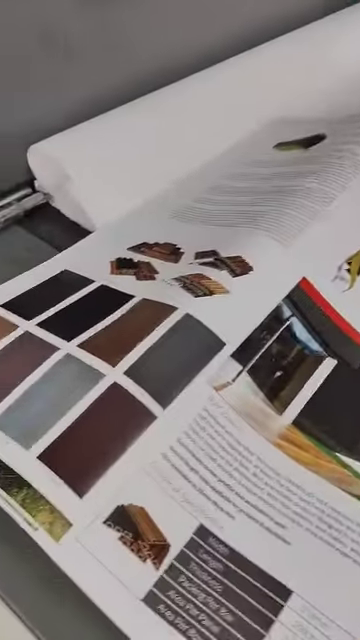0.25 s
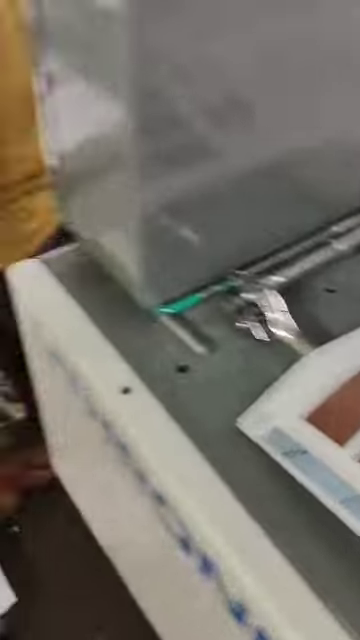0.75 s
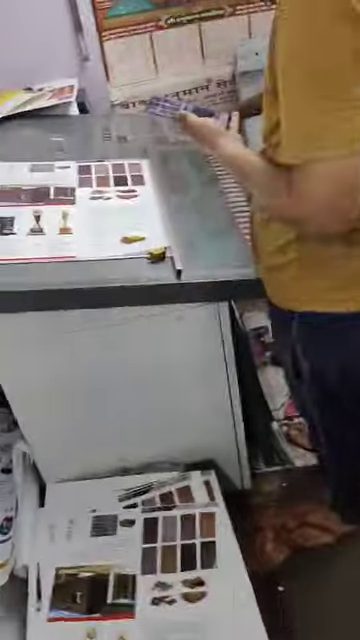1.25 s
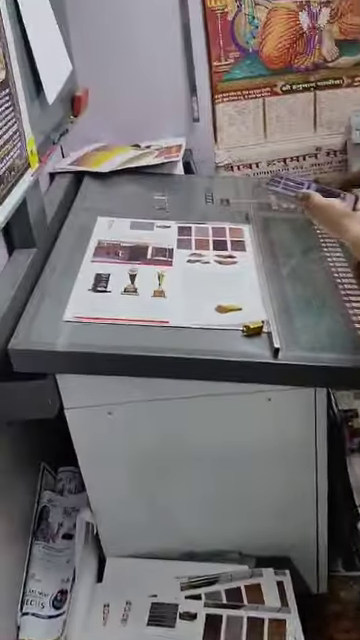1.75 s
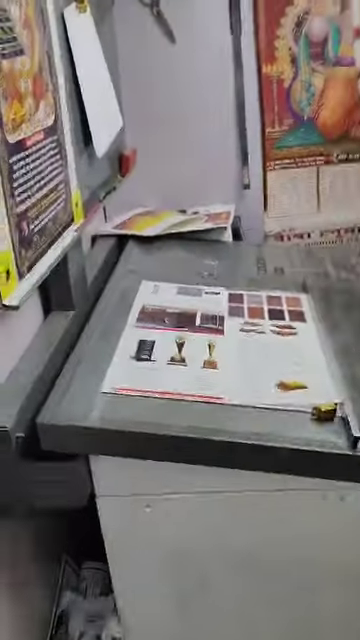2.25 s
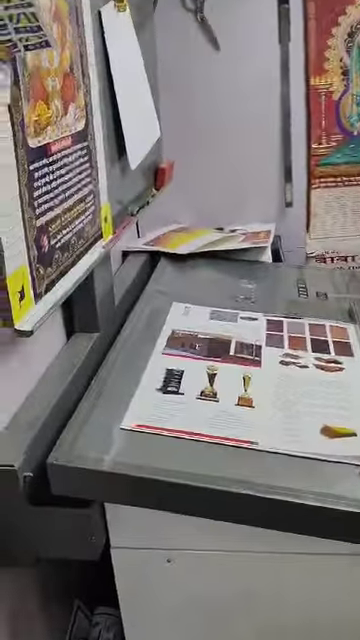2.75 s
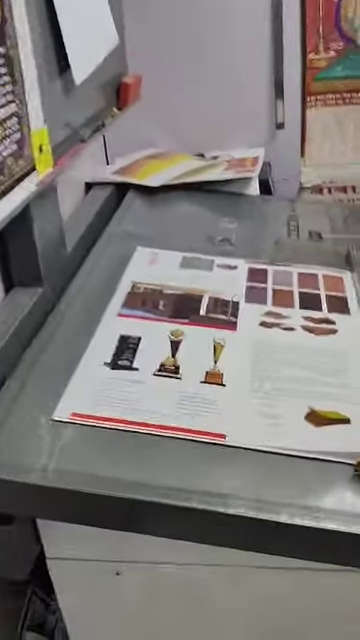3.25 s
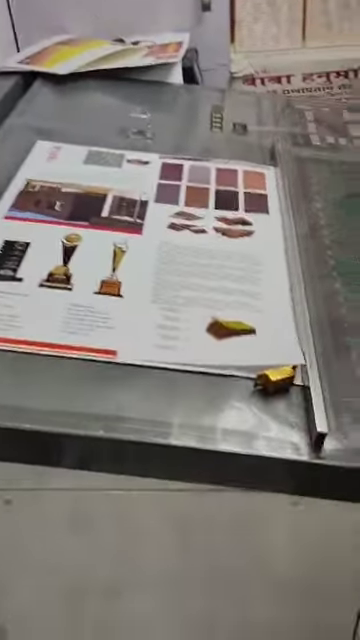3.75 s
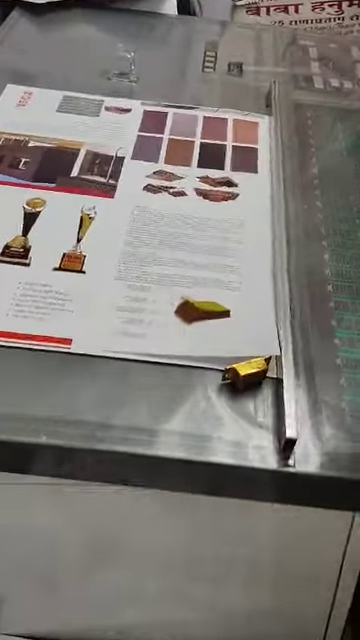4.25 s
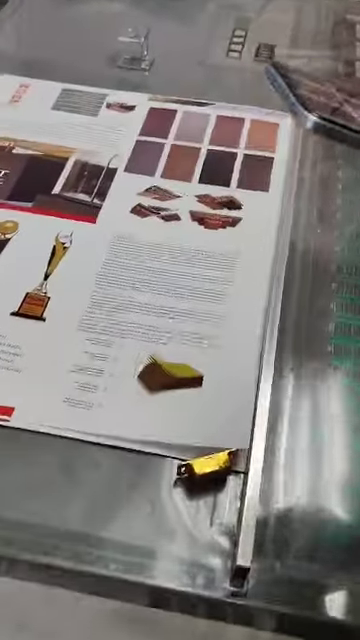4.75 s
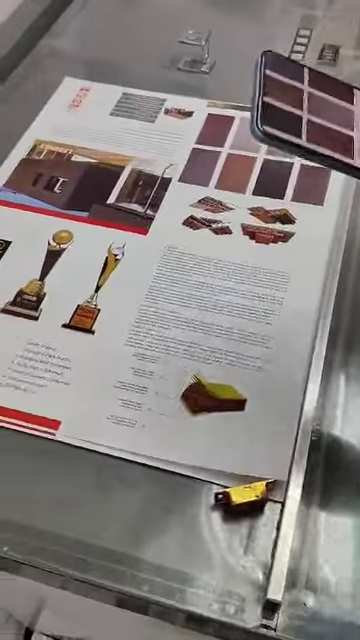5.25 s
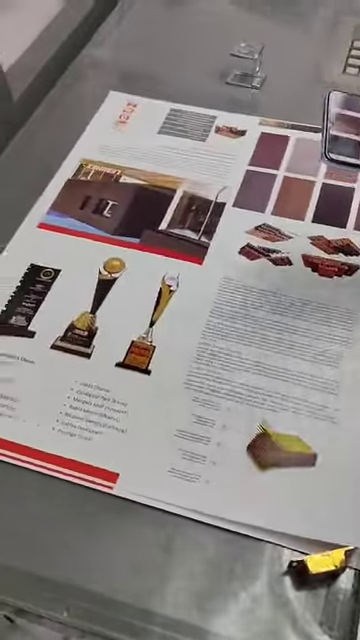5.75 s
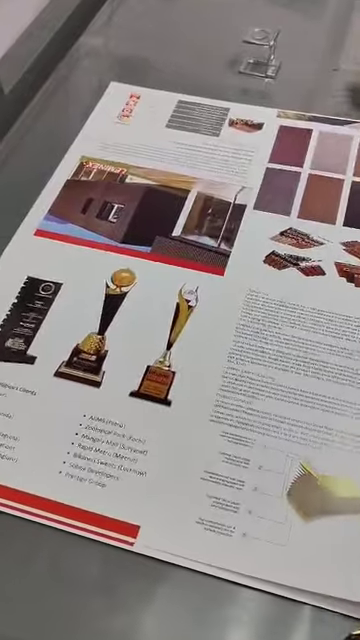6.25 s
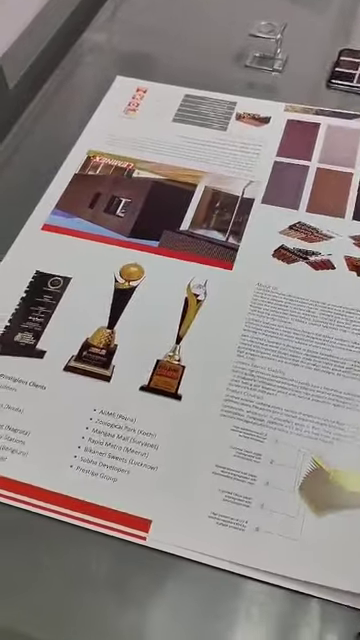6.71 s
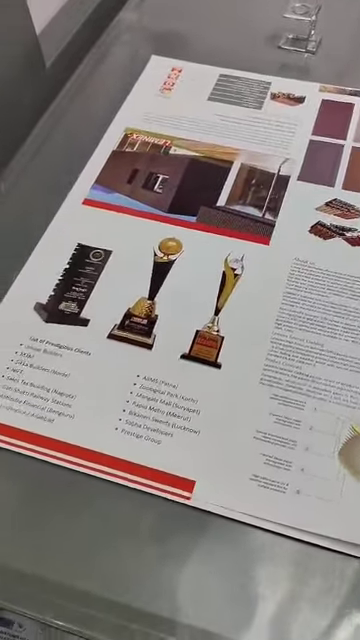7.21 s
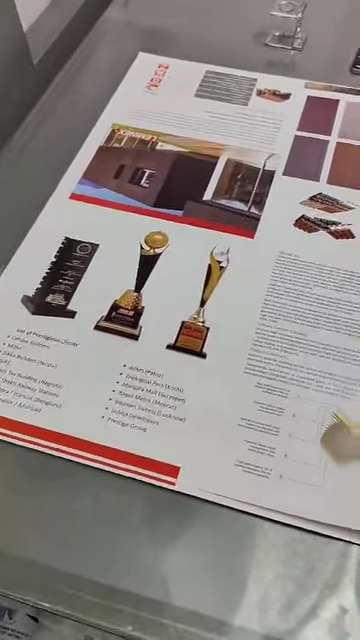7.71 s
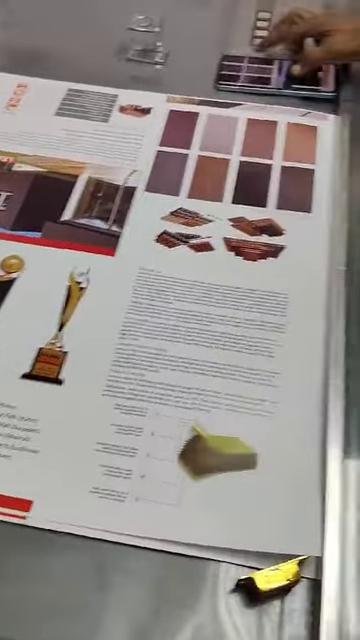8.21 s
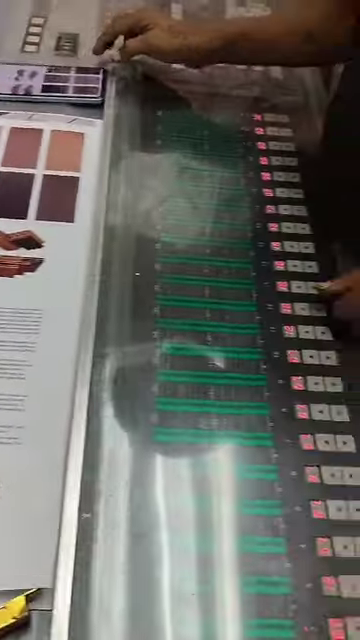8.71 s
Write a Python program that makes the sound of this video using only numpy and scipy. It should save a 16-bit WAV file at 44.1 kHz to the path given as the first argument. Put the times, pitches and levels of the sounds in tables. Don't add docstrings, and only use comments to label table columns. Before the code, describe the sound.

Steady printing machine drone with hissing blowers, gripper clatter, bright pneumatic bursts and dull thuds repeating every half second, heard close by handheld phone.

```python
import sys
import numpy as np
from scipy import signal
from scipy.fft import rfft, irfft, next_fast_len
from scipy.io import wavfile
from scipy.ndimage import uniform_filter1d, map_coordinates

SR = 44100
rng = np.random.default_rng(int(sys.argv[2]) if len(sys.argv) > 2 else 0)


def unload_audio(sound):
    columns = np.transpose(np.atleast_2d(sound))
    steps = np.round(np.clip(columns, -1, 1) * 32767)
    wavfile.write(sys.argv[1], SR, steps.astype(np.int16))


def level_to_linear(level):
    exponent = np.asarray(level, float) / 20
    return 10 ** exponent


N = 395577
TIME = np.arange(N) / SR

# [t/s, peak level/dB, nozzle re peak/dB, open time/s, low jet re peak/dB]
PUFFS = [(0.3765, -13.5, -8, 0.012, -1), (0.895, -12, -13, 0.032, -0.5), (1.403, -13, -8, 0.037, -1),
         (1.9254, -15, -8, 0.05, -1), (2.438, -14, -11, 0.039, 2), (2.9537, -12.5, -8.5, 0.036, -.3),
         (3.4634, -14.5, -12, 0.081, 1), (3.9824, -12.5, -9.5, 0.049, 0.5), (4.4973, -12, -9, 0.015, 1.5),
         (5.0114, -15.5, -7.5, 0.051, 0.5), (5.524, -13.5, -11, 0.022, 1), (6.0445, -13, -8.5, 0.053, 0.5),
         (6.5534, -14, -11.5, 0.079, 1.5), (7.0748, -15.5, -10.5, 0.055, 2.5),
         (7.582, -14.5, -9, 0.063, 2.5), (8.1035, -14, -10.5, 0.052, 2), (8.614, -14, -13, 0.033, 1.5)]
PUFF_TIMES = np.array(PUFFS)[:, 0]
# [t/s, rms level/dB, open time/s]
VENT = (.891, -20, .095)
# [f/Hz, density/dB per Hz]
METAL = [(1500, -6), (2600, -2), (4200, 0), (8000, -3), (11000, -8), (14000, -8)]
# [f/Hz, correlation]
ALIKE = [(30, 0.97), (130, 0.95), (290, 0.8), (630, 0.37), (950, 0.013), (1250, -0.28), (1800, 0.0095),
         (14700, 0)]


def unit(x):
    return x / np.sqrt(np.mean(x ** 2) + 1e-20)


def along(points, hz):
    f, v = np.transpose(points)
    return np.interp(np.log(hz + 1), np.log(f + 1), v)


def curves(rows):
    s, *columns = np.transpose(rows)
    return [np.interp(TIME, s, column) for column in columns]


def wobble(rate, channels=1):
    knots = rng.standard_normal((channels, int(N * 40 / SR) + 4))
    coarse = [map_coordinates(k, [TIME[::64] * rate]) for k in knots]
    return np.array([curve.repeat(64)[:N] for curve in coarse])


def filtered(x, response):
    m = next_fast_len(N + 8192)
    return irfft(rfft(x, m) * response(np.fft.rfftfreq(m, 1 / SR)), m)[..., :N]


def rush(spectrum, patchy_db):
    z = signal.stft(rng.standard_normal((2, N)), nperseg=512)[2]
    patches = uniform_filter1d(rng.standard_normal(z.shape[1:]), size=6, axis=0)
    patches = uniform_filter1d(patches, size=10, axis=1)
    pair = signal.istft(z * level_to_linear(patchy_db * unit(patches)), nperseg=512)[1][:, :N]

    def mid_side_response(hz):
        spread = np.arccos(np.clip(along(ALIKE, hz), -1, 1)) / 2
        return level_to_linear(along(spectrum, hz)) * [np.cos(spread), np.sin(spread)]

    mid, side = filtered(pair, mid_side_response)
    return unit(np.array([mid + side, mid - side]))


def tone(hz, drift, fade_db, rate):
    apart = 1 - np.clip(along(ALIKE, hz), 0, 1)
    lag = apart * (np.pi / 4 * np.array([[1], [-1]]) + 0.14 * wobble(rate, channels=2))
    phase = drift * wobble(rate) + lag + rng.uniform(0, 2 * np.pi)
    fade = level_to_linear(fade_db * (wobble(rate) + apart * wobble(rate, channels=2)))
    return np.sqrt(2) * fade * np.sin(2 * np.pi * hz * TIME + phase)


def burst(s, rise, hold, t60):
    out = np.zeros(N)
    start = max(int(s * SR), 0)
    length = int((abs(hold) + 2 * abs(t60)) * SR) + 64
    t = np.maximum(TIME[start:start + length] - s, 0)
    decay = level_to_linear(-60 * np.maximum(t - hold, 0) / max(t60, 1e-3))
    out[start:start + len(t)] = (1 - np.exp(-t / max(rise, 1e-4))) * decay
    return out


def spotted_level(wave):
    mean_db, spots = wave
    return mean_db + sum(lift_db * np.exp(-(2 * (TIME - s) / width) ** 2) for s, width, lift_db in spots)


def machine():
    frame = -19, [(.8, 0.27, 0.5), (1.5, 0.2, -2.5), (2.25, 0.29, -1), (2.55, .2, 0.5), (3.15, 0.71, 2.5),
             (3.66, 0.1, -1), (5.06, .08, -8), (5.95, 0.69, 3), (7.62, 0.083, -4), (7.8, 0.36, -2),
             (8.45, 0.069, 0)]
    # [t/s, level/dB]
    near = [(0, 0.5), (.9, 0.6), (1.7, -0.5), (3.5, -0.5), (5.5, 0), (8.97, -0.1)]
    # [f/Hz, density/dB per Hz]
    rumble_colour = [(18, -60), (32, -22), (65, -1.5), (85, -4.5), (100, 3.5), (135, -0.5), (175, 1.5),
                     (260, -9), (400, -29.5)]
    roar_colour = [(120, -23), (200, -3), (295, -4), (370, -1.5), (420, -3), (460, -2.5), (540, -5.5),
                   (685, -6), (720, -8), (1000, -11), (1160, -8), (1300, -14.5), (1700, -25.5), (2500, -34)]
    hiss_colour = [(600, -13), (1300, -2), (1700, -3), (14500, 2)]
    roar_db, hiss_db = -15, -21.5
    null_hz, null_width_hz, null_db = 187, 16, -5
    near_db, = curves(near)
    rumble = level_to_linear(spotted_level(frame) + 1.1 * wobble(3.1)) * rush(rumble_colour, patchy_db=-0.5)
    roar = level_to_linear(roar_db + near_db + 0.077 * wobble(10.0)) * rush(roar_colour, patchy_db=0.18)
    body = filtered(rumble + roar, lambda hz: level_to_linear(null_db * np.exp(-((hz - null_hz) / null_width_hz) ** 2)))
    heave = level_to_linear(hiss_db + 6 + 0.69 * wobble(13) + 0.59 * wobble(36))
    return body + heave * suction() * rush(hiss_colour, patchy_db=1.5)


def suction():
    return level_to_linear(-1.1 * sum(burst(s - .075, 0.011, 0.061, 0.055) for s in PUFF_TIMES))


def tones():
    pump_hz = [28.2, 48.4, 96.9, 193.8]
    pump_wander = [.12, .3, 1.3, .1]
    gear_hz = [1164.1, 2217, 4434.5]
    # [f/Hz, rms level/dB]
    wheels = [(55.2, -40), (131.9, -35), (454.9, -37), (986.5, -41), (1144, -37.5), (1983.7, -52),
              (2138.5, -54), (3493.8, -64)]
    # [t/s, level/dB]
    load = [(0, -20), (.25, -24), (.85, -21.5), (1.05, -21.5), (1.3, -28), (1.75, -22), (2, -46),
            (2.4, -38), (2.7, -23), (3.3, -27), (3.5, -38), (3.7, -23.5), (4.1, -27.5), (4.4, -20.5),
            (4.7, -18.5), (8.0, -17.5), (8.4, -16), (8.55, -38)]
    fan_wave = -30.5, [(.5, 1.4, -3), (3.7, .2, 9), (4.9, .3, 9), (5.6, .5, 5.5), (6.7, .3, -3),
                (7.8, .4, 5)]
    motor_wave = -31, [(2.75, 0.28, -12), (3.35, .3, -2), (4, .3, -9), (8, .4, 9), (8.9, .5, -16)]
    vane_wave = -28.5, [(.5, 0.25, 13), (1.5, 2.4, -7), (3.6, .2, -1), (5.3, 0.23, 5), (6.9, 0.22, 5),
                 (7.65, 0.18, -18), (7.95, 0.31, 6), (8.64, 0.22, 7)]
    mesh_wave = -27.5, [(0, 1, -16), (.7, .12, 8), (1.05, 0.41, -4), (1.85, 0.12, -16), (2.2, 0.28, -2),
                 (2.45, 0.19, -1), (2.82, 0.38, 8.5), (3.2, 0.14, -9), (3.95, 0.17, -10), (4.3, 0.26, 1),
                 (4.65, 0.14, 2), (5.2, 0.49, -9), (5.75, .15, -4), (6.47, 0.13, -11), (6.6, .12, 2),
                 (7.35, 0.67, 3.5), (7.68, 0.08, -4), (7.9, .3, 0.5), (8.16, 0.15, 0), (8.6, 0.28, -7),
                 (8.8, .2, 3)]
    bearing_wave = -39.5, [(.95, .12, 8), (4.55, .12, 5.4), (6.57, 0.11, 7.2), (7.62, 0.14, 8.8)]
    twice_wave = -37, [(.55, .15, 9.3), (.95, 0.13, 8), (1.45, 0.12, 5.4), (3.33, 0.22, 9.8), (4.1, .2, 4),
                  (6.35, 0.35, 11), (7.62, .2, 5), (8.75, .2, 4)]
    pump_db = spotted_level(fan_wave), spotted_level(motor_wave), spotted_level(vane_wave), *curves(load)
    hum = sum(level_to_linear(db - 1.0) * tone(hz, drift, 0.93, 3 + 6 * drift)
              for hz, db, drift in zip(pump_hz, pump_db, pump_wander))
    lean_db = -4 + 7.5 * wobble(1.99)[0]
    mesh_db = spotted_level(mesh_wave) - .5 + np.outer([.5, -.5], lean_db)
    mesh = level_to_linear(mesh_db) * tone(gear_hz[0], .6, 1.1, 15)
    bearing = level_to_linear(spotted_level(bearing_wave) - 6) * tone(gear_hz[1], 1.3, 2.5, 7)
    twice = level_to_linear(spotted_level(twice_wave) + np.array([[-8.5], [-3.5]])) * tone(gear_hz[2], .8, 2.1, 5.9)
    faint = sum(level_to_linear(db) * tone(hz, 2.3, 2.7, 3) for hz, db in wheels)
    return hum + mesh + bearing + twice + faint


def swells():
    # [f/Hz, density/dB per Hz]
    casing_colour = [(320, -56), (365, 28), (392, -25), (415, 13.5), (470, -36)]
    boom_wave = -28, [(.25, 0.76, 10), (1.85, .15, 9), (2.1, 0.16, 0), (3.55, 1, 2), (4.3, 0.83, -3),
                 (6.2, 0.8, -12), (7.7, 0.85, 6), (8.6, .2, 10)]
    ring_pulses = -7, [(3.1, 0.41, 7), (4.25, 0.26, 9), (3.32, 0.11, 10.5), (3.48, .11, 17),
                   (3.63, 0.061, 14.5), (3.81, 0.12, 15), (3.97, 0.14, -6), (4.12, 0.22, 10), (4.35, .3, 1)]
    idler_wave = -33, [(.2, 1, 6.5), (1.6, 0.62, 6.3), (2.7, 0.13, 9.8), (3.8, .25, 8.1), (4.35, 0.4, 7.8),
                  (4.75, 0.13, 9.2), (5.75, 0.33, 11.4), (8.3, 0.23, 6)]
    pair_wave = -36.5, [(.62, 0.18, 7.2), (1.8, 0.31, 6), (2.2, 0.22, 7), (3, 0.93, 5.3), (3.97, 0.18, 7.7),
                 (4.97, 0.17, 11), (4.45, .2, 6), (5.65, .2, 6), (6.15, 0.17, 5), (7.6, .5, 5.4)]
    sideband_wave = -30.5, [(1.4, .4, 3.4), (2.12, 0.22, 7.7), (2.8, .25, 4.5), (4.4, 0.13, 14.5),
                     (6.3, 0.61, 10.7), (7.3, .4, 4.8), (8.4, .3, 6.7), (8.85, 0.22, 11)]
    # [f/Hz, level/dB]
    boom_notes = ((394, 0), (388, -13))
    pair_hz = (947.5, 954.2)
    sideband_hz = (1121.1, 1126.5)
    idler_hz = 681
    ring = level_to_linear(spotted_level(ring_pulses)) * sum(level_to_linear(db) * tone(hz, .6, .8, 5) for hz, db in boom_notes)
    boom = level_to_linear(spotted_level(boom_wave)) * (level_to_linear(-5) * rush(casing_colour, patchy_db=0.0) + ring)
    idler = level_to_linear(spotted_level(idler_wave) - 3.5) * tone(idler_hz, 1.1, 2.6, 14)
    pair_amp = level_to_linear(spotted_level(pair_wave) - 2.2)
    pair = sum(pair_amp * tone(hz, .5, 1.2, 4) for hz in pair_hz)
    sideband_amp = level_to_linear(spotted_level(sideband_wave) - 8)
    return boom + idler + pair + sum(sideband_amp * tone(hz, 1.3, 1.5, 5) for hz in sideband_hz)


def feeder():
    # [f/Hz, density/dB per Hz]
    leak_colour = [(6000, -23), (7500, 8), (8500, -1.5), (10000, 7), (11800, -6), (13500, -6), (14500, -30)]
    jet_colour = [(900, -3), (1250, 16.5), (1500, 8), (1800, 3.5), (2400, 3.5), (3000, 5), (3600, -1),
                  (4700, -13)]
    nozzle_colour = [(2200, -28), (3000, -13), (3900, 5.5), (4700, -7), (5500, -23), (6500, -33)]
    blast_colour = [(3500, -22), (5000, -8), (8200, 0), (11000, -1.5), (12500, 1), (14500, -7.5)]
    whistle_colour = [(11500, -26), (12500, -8), (13000, -1), (13650, 2), (14200, -9), (14600, -9)]
    # [delay t/s, size]
    latch_clicks = [(.085, .3), (.14, .4), (.26, .25)]
    # [t/s, rms level/dB, open time/s]
    dribble = (1.03, -20, 0.079)
    jet_re_puff_db, jet_db_per_s = -6.5, -0.08
    whistle_db, whistle_db_per_s = -11.3, .35
    sputter_db = 1.6
    leak, jet, nozzle, blast, whistle = np.zeros((5, N))
    for s, db, nozzle_db, hold, jet_db in PUFFS:
        s = s - .003
        tail = level_to_linear(-8.5) * burst(s, 0.037, hold, 2.5)
        latches = sum(size * burst(s + after, .001, .004, .07) for after, size in latch_clicks)
        seep = burst(s - .028, 0.003, 0.016, 0.063) + 0.62 * burst(s + 0.092, 0.014, .03, .3)
        leak += level_to_linear(db - 7.5) * seep
        jet_amp = level_to_linear(db + jet_db + jet_re_puff_db + jet_db_per_s * s)
        jet += jet_amp * (burst(s, 0.0015, hold, 0.24) + 0.7 * tail)
        nozzle += level_to_linear(db + nozzle_db) * (burst(s, 0.0075, hold, 0.2) + 0.52 * tail)
        blast += level_to_linear(db - 0.5) * (burst(s, 0.0024, hold, 0.21) + tail + latches)
        whistle += level_to_linear(whistle_db + whistle_db_per_s * s) * burst(s - .002, .004, .022, .3)
    blast += level_to_linear(-16.5) * burst(-0.16, .01, .05, 2.7)
    dribble_s, dribble_db, dribble_hold = dribble
    blast += level_to_linear(dribble_db) * burst(dribble_s, .02, dribble_hold, .3)
    low = jet * rush(jet_colour, patchy_db=.6) + nozzle * rush(nozzle_colour, patchy_db=.6)
    high = blast * rush(blast_colour, patchy_db=1.5) + whistle * rush(whistle_colour, patchy_db=1.2)
    flapping = unit(uniform_filter1d(rng.standard_normal(N), size=120))
    sputter = level_to_linear(sputter_db * flapping)
    return sputter * low + np.sqrt(sputter) * high + leak * rush(leak_colour, patchy_db=0.5)


def valve():
    strike_db, chatter_db = -2.5, -6
    chatters, chatter_s = 5, .07
    chance = rng.random((len(PUFFS), chatters, 2))
    blows = np.zeros(N)
    for (s, db, *_), flaps in zip(PUFFS, chance):
        blows += level_to_linear(db + strike_db) * burst(s - .001, .0004, .003, .05)
        for when, size in flaps:
            blows += level_to_linear(db + chatter_db + 5 * size) * burst(s + .01 + chatter_s * when, .0004, .001, .03)
    return blows * rush(METAL, patchy_db=2)


def grippers():
    # [f/Hz, density/dB per Hz]
    clatter_colour = [(800, -38), (1300, 3), (1800, -9), (2400, -10), (4000, -30)]
    # [t/s, peak level/dB]
    lone_ticks = [(.055, -21), (0.1194, -10), (.205, -19), (.496, -13), (.946, -12), (1.273, -5.5),
                  (1.324, -26), (2.574, -18), (3.3234, -6), (4.752, -11), (4.985, -24), (5.06, -5),
                  (5.2294, -26), (5.7394, -15), (6.22, -15), (6.925, -14), (7.566, -19), (7.739, -25),
                  (8.917, -25)]
    starts = PUFF_TIMES - .09
    sizes_db = rng.normal(0, 1.2, (len(starts), 1))
    clatter = sum(level_to_linear(-25.5 + size) * burst(s, 0.0078, 0.021, .14) for s, size in zip(starts, sizes_db))
    ticks = sum(level_to_linear(db - 11.0) * burst(s, .0007, .004, 0.2) for s, db in lone_ticks)
    return clatter * rush(clatter_colour, patchy_db=1) + ticks * rush(METAL, patchy_db=.5)


def cylinder():
    # [f/Hz, density/dB per Hz]
    thud_colour = [(300, -9), (480, 7), (700, -7), (1000, 0), (1500, -42)]
    blows = sum(burst(s + 0.032, 0.0041, 0.081, 0.23) for s in PUFF_TIMES)
    return level_to_linear(-25.0) * blows * rush(thud_colour, patchy_db=-1.5)


def vent():
    # [f/Hz, density/dB per Hz]
    line_colour = [(1600, -6), (2150, -5), (2500, -10), (3000, 0), (3500, -8), (4400, -3), (6000, -1),
                   (10000, -19), (14000, -23)]
    spray_colour = [(4300, -30), (5300, -1), (5900, 1), (6700, -2), (7800, -30)]
    # [t/s, rms level/dB, open time/s]
    last_spit = (1.1, -18, .035)
    s, db, hold = VENT
    flow = burst(s, .002, hold, .06) + level_to_linear(-3.0) * burst(s + hold, .005, 0.19, .08)
    spit_s, spit_db, spit_hold = last_spit
    spit = level_to_linear(spit_db) * burst(spit_s, .004, spit_hold, .12) * rush(spray_colour, patchy_db=7)
    return level_to_linear(db + 1) * flow * rush(line_colour, patchy_db=.6) + spit


def pipe():
    # [f/Hz, width/Hz, level/dB]
    pipe_modes = [(2160, 40, 4), (2400, 92, 2), (2960, 60, 3), (3500, 56, -9), (4200, 230, -13)]

    def resonance(f):
        return sum(level_to_linear(g) * 1j * f * width / (centre * centre - f * f + 1j * f * width)
                   for centre, width, g in pipe_modes)

    s, db, hold = VENT
    song = unit(filtered(rng.standard_normal((2, N)), resonance))
    flow = burst(s, .002, hold - .01, .06) + level_to_linear(-9) * burst(s + hold, .005, .06, .1)
    return level_to_linear(db - 1.5) * flow * song


def draught():
    # [t/s, level/dB, f/Hz, flurry/s]
    bumps = [
        (4.63, -21, 40.5, 0.055),
        (4.875, -12, 60, 0.046),
        (4.95, -11, 70, 0.039),
        (5.0, -17, 80, 0.022),
        (5.189, -5, 75, 0.016),
        (5.255, -12, 70, 0.013),
        (5.40, -17, 45, .03),
        (5.56, -13, 55, .02),
        (5.62, -19, 50, 0.036),
        (8.25, -22, 49.6, .05),
    ]
    # [f/Hz, density/dB per Hz]
    gust_colour = [(15, -7), (50, 3), (120, -9), (250, -26), (500, -47)]
    push, flurry = np.zeros((2, N))
    for s, db, hz, spread in bumps:
        u = (TIME - s - .012) * hz
        push += level_to_linear(db + 1) * np.exp(-(u / .5) ** 2) * np.sin(2 * np.pi * u + 1.5 * u ** 2)
        flurry += level_to_linear(db - 6.0) * burst(s - .01, .006, spread, 0.1)
    eddies = filtered(rng.standard_normal((2, N)), lambda hz: level_to_linear(along(gust_colour, hz)))
    return np.outer([-.6, .9], push) + flurry * unit(eddies)


def panels():
    flutter_wave = -35.5, [(1.1, 0.18, 3.7), (1.8, 0.37, 11), (2.25, 0.18, 7.2), (2.8, .2, 9),
                    (3.92, 0.18, 10), (6.72, .2, 4.9)]
    upper_wave = -41, [(4.33, 0.8, 16)]
    # [f/Hz, rms level/dB]
    overtones = [(5824, -44), (6651, -48)]
    flutter_hz, upper_hz = 130, 400
    flutter = level_to_linear(spotted_level(flutter_wave)) * tone(flutter_hz, 1.2, 2.5, 9)
    upper = level_to_linear(spotted_level(upper_wave)) * tone(upper_hz, .5, 1, 5)
    return flutter + upper + sum(level_to_linear(db) * tone(hz, .8, 2.5, 5) for hz, db in overtones)


def rattle():
    links = rng.random((260, 2))
    knocks = np.zeros(N)
    knocks[(links[:, 0] * N).astype(int)] = level_to_linear(-5 * np.log(links[:, 1] + .02))
    decay_s = .004
    envelope = signal.lfilter([1], [1, -np.exp(-1 / (decay_s * SR))], knocks)
    return level_to_linear(-40) * envelope * rush(METAL, patchy_db=4)


def passing():
    passing_hz = 1078, 918
    # [t/s, width/s, lift/dB]
    passing_waves = [
        (-50, [(3.3, .3, 6), (4.35, .45, 14), (8.4, .2, 8)]),
        (-48, [(5.33, .15, 22), (5.58, .12, 15)]),
    ]
    return sum(level_to_linear(spotted_level(wave)) * tone(hz, .6, 1, 5) for hz, wave in zip(passing_hz, passing_waves))


def scene():
    running = machine() + tones() + swells()
    each_sheet = feeder() + valve() + grippers() + cylinder()
    air = vent() + pipe() + draught()
    return running + each_sheet + air + panels() + rattle() + passing()


def roll_off(x):
    return signal.sosfilt(signal.butter(12, 14450, fs=SR, output="sos"), x)


def record(dry):
    # [f/Hz, level/dB]
    mic_colour = [(4500, -1.5), (5200, -7.5), (5560, -13.5), (5720, -11.5), (6000, -12), (6300, -19.5),
                  (6650, -13.5), (6870, -18), (6980, -12.5), (7500, -5), (11600, -5.5), (11900, -10),
                  (13200, -12), (14300, -10)]
    left_port = [(70, 2.26), (1600, 3), (2200, 7.5), (2600, 6), (4200, 0), (5200, -2), (7500, -1),
                 (8200, 8), (9200, 2), (10000, 3), (10500, -1), (11500, -3), (12000, -4)]
    right_port = [(1600, 2.5), (2200, 5.5), (2500, 4), (3200, 5.5), (4400, 4.5), (5200, 0), (7700, 0),
                  (9100, -5.5), (10400, -3), (11200, 5), (12000, -6.5)]
    top_hz = 14280

    def ports(hz):
        cavities_db = [along(left_port, hz), along(right_port, hz)]
        return level_to_linear(along(mic_colour, hz) + cavities_db) * (hz < top_hz)

    x = filtered(dry, ports)
    heard = filtered(x, lambda hz: 1 + hz / 1500)
    power = np.abs(uniform_filter1d((heard ** 2).mean(0), size=1800))
    loud_db = 10 * np.log10(power + 1e-9)
    x = x * level_to_linear(-.4 * (loud_db - np.median(loud_db)))
    x = x / (1 + np.abs(x / .97) ** 6) ** (1 / 6)
    return roll_off(x)


dry = scene()
out = record(dry)
unload_audio(out)
```